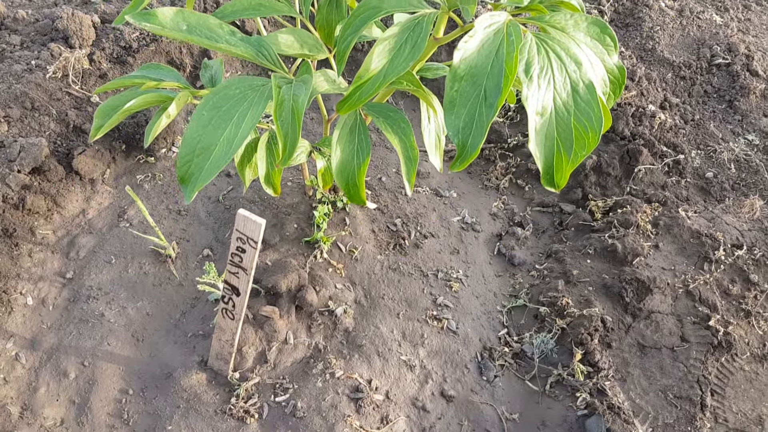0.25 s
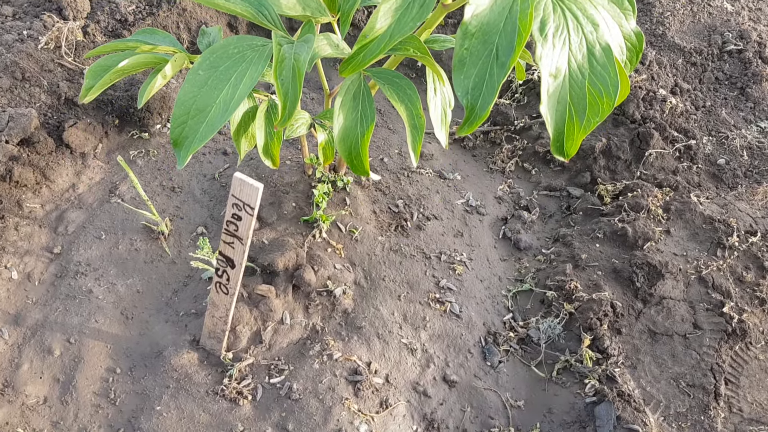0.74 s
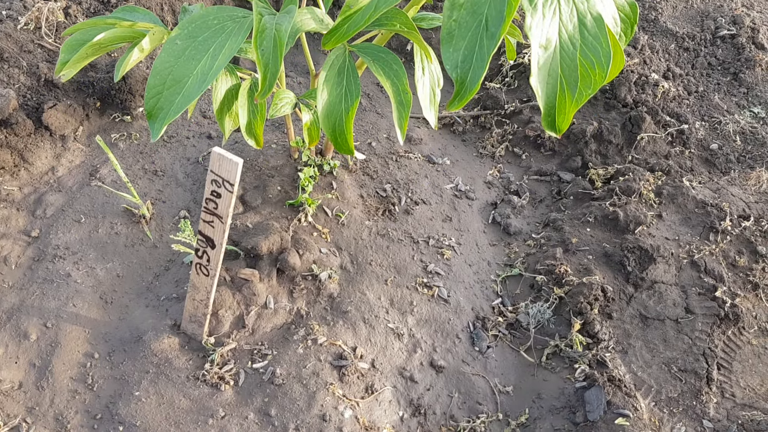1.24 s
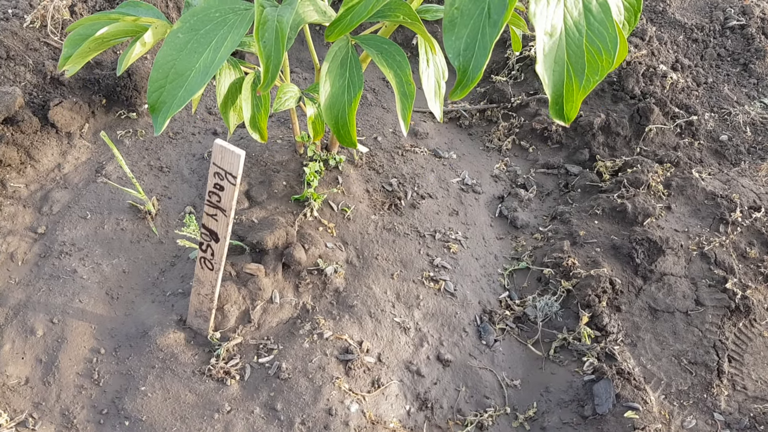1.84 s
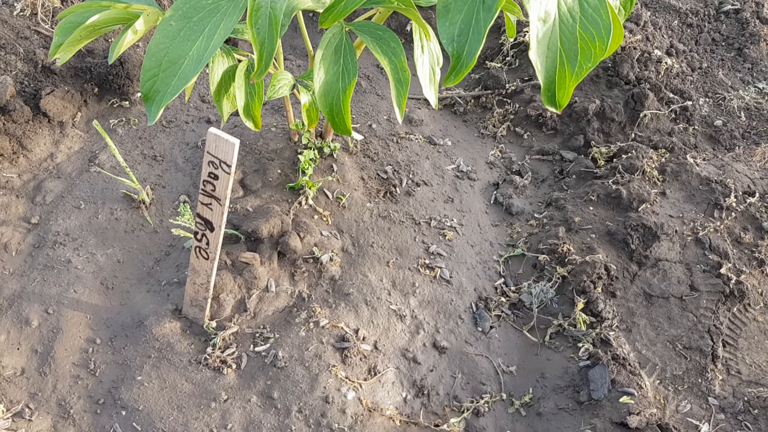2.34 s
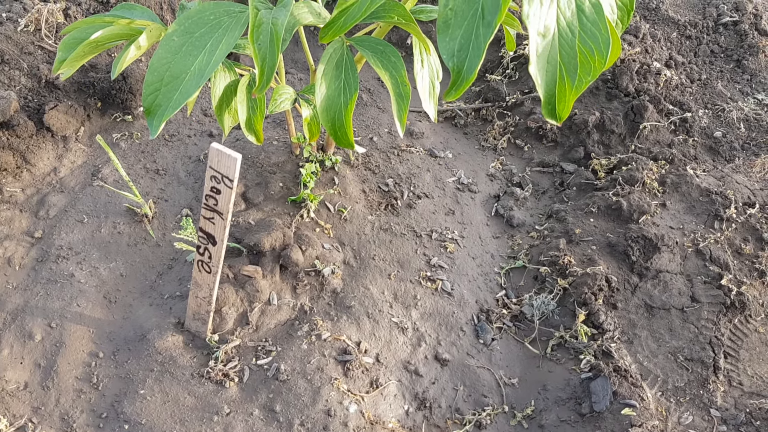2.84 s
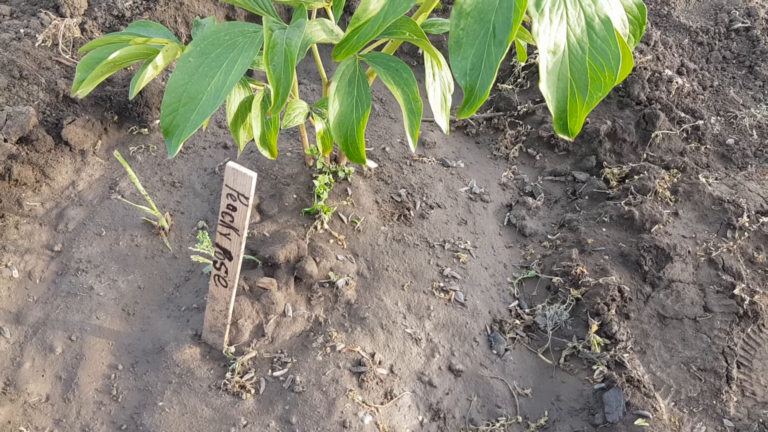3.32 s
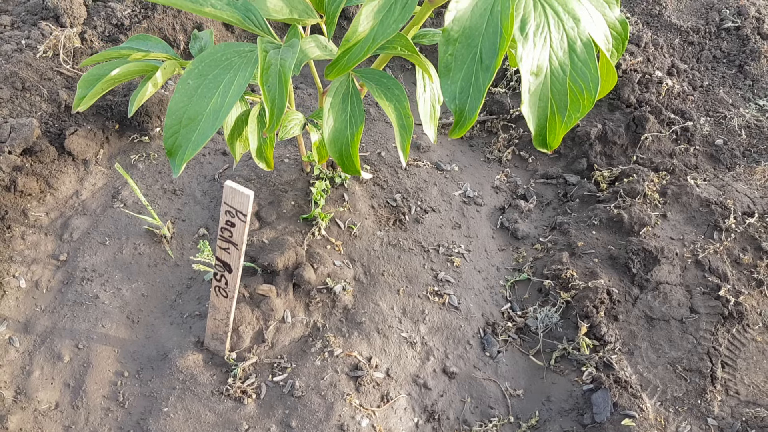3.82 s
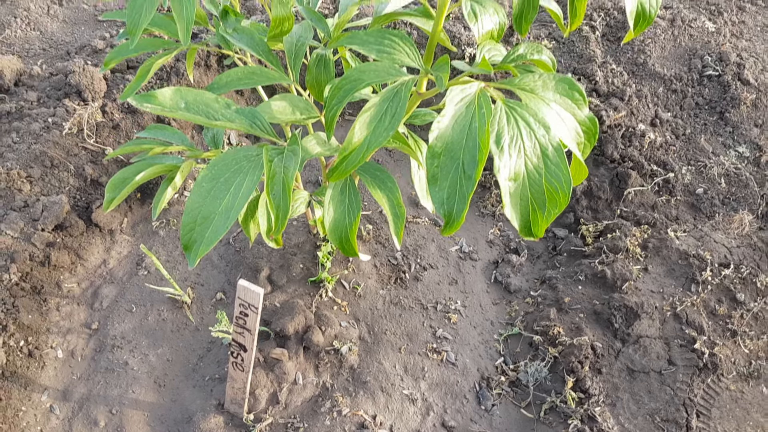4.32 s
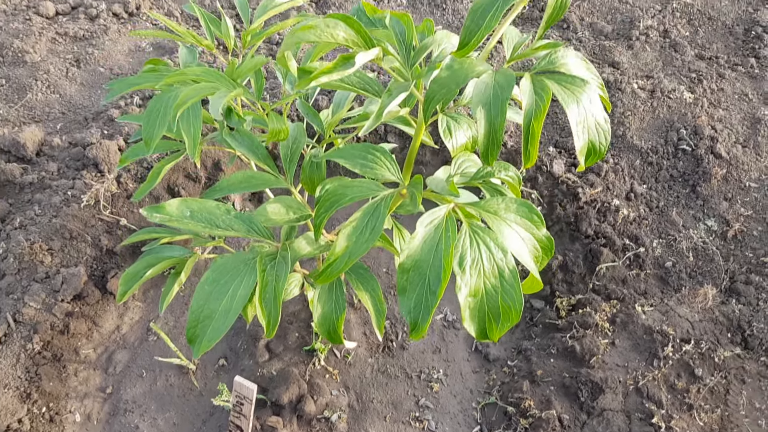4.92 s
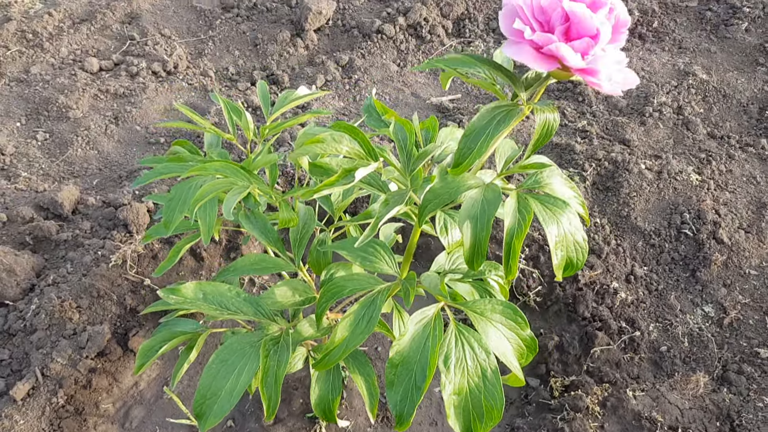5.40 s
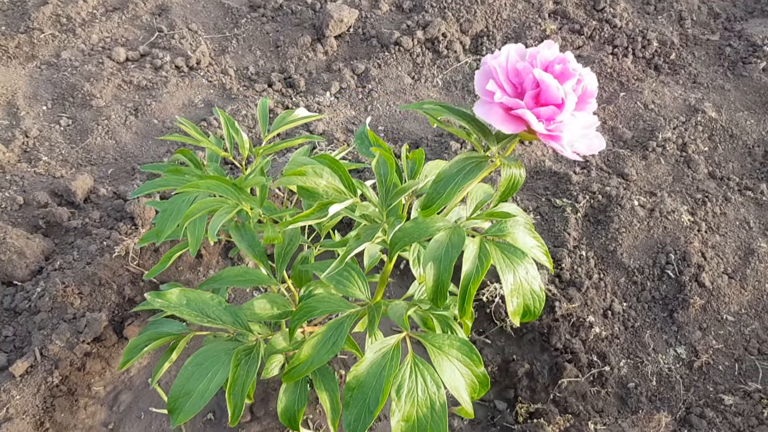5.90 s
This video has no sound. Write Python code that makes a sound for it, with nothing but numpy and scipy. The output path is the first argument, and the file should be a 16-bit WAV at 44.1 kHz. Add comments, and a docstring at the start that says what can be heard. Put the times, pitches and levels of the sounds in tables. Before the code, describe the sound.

Crickets chirp close by in a garden, in short, high pulses over a faint distant chorus. Low wind rumbles on the left side of a hand-held microphone, builds to hard buffets and cuts out just past halfway. The chirping goes on a little softer, and near the end come soft handling thuds and scuffs on dry soil. Birds and traffic are barely audible far off.

```python
"""Crickets chirp close by in a flower bed while wind rumbles on the left port of a hand-held microphone.
Each chirp is a short run of wing strokes, each falling in pitch; a far chorus trills behind them.
Past halfway the left rumble cuts out, and towards the end the holder shifts on dry soil.
Small birds, a dove, a rooster and hoarse calls carry faintly from far off, over hiss and traffic."""
import sys
import numpy as np
from scipy import signal
from scipy.fft import rfft, irfft
from scipy.io import wavfile
from scipy.ndimage import uniform_filter1d

SR = 44100
rng = np.random.default_rng(int(sys.argv[2]) if len(sys.argv) > 2 else 0)


def digitize_waveform(pressure):
    """Quantize a signal to 16-bit integers and store it at the path in sys.argv[1].

    Rows of a 2-D input are taken as channels; values are limited to [-1, 1].
    """
    field = np.atleast_2d(pressure).T
    bounded = np.clip(field, -1, 1)
    quanta = np.round(bounded * 32767).astype(np.int16)
    wavfile.write(sys.argv[1], SR, quanta)


N = 271308
T = np.arange(N) / SR
HZ = np.maximum(np.fft.rfftfreq(N, 1 / SR), 1)


def from_db(db):
    """Decibels to gain."""
    return 10 ** (np.asarray(db) / 20)


def rms_one(x):
    """Each channel scaled to rms 1."""
    return x / np.sqrt(np.mean(x ** 2, axis=-1, keepdims=True) + 1e-30)


def level_curve(rows):
    """Rows of (time [s], level [dB]) interpolated to every sample."""
    return np.interp(T, *np.transpose(rows))


def pan(left_db):
    """Channel gains for a left-minus-right level."""
    return from_db(left_db * np.array([[.5], [-.5]]))


def noise(spectrum, correlation=0):
    """Stereo noise of rms 1 with a given spectrum and left-right correlation."""
    hz, db = np.transpose(spectrum)
    gain = from_db(np.interp(np.log(HZ), np.log(hz), db))
    mid, side = irfft(rfft(rng.standard_normal((2, N))) * gain, N)
    return rms_one(np.sqrt(1 + correlation) * mid + np.sqrt(1 - correlation) * side * [[1], [-1]])


def drift(rate_hz):
    """A random wander of rms 1, mostly slower than rate_hz."""
    return rms_one(irfft(rfft(rng.standard_normal(N)) / (1 + (HZ / rate_hz) ** 2) ** 2, N))


def evened(x, span_s):
    """Noise with its slow swells taken out, so that a level curve alone sets them."""
    size = max(int(span_s * SR), 8)
    power = uniform_filter1d(uniform_filter1d(x ** 2, size), size)
    return rms_one(x / np.sqrt(np.abs(power) + 1e-6))


def swells(rows):
    """Envelope of bell-shaped bursts from rows of (time [s], half-width [s], level [dB])."""
    powers = (from_db(db) ** 2 * np.exp(-np.minimum(((T - s) / width) ** 2, 60)) for s, width, db in rows)
    return np.sqrt(sum(powers))


def scatter(x, t60_s, count=60):
    """Sparse echoes from soil, plants and fences, different at each port; unit power."""
    delay_s = rng.random((2, count)) * t60_s
    gains = rng.standard_normal((2, count)) * from_db(-60 * delay_s / t60_s)
    echoes = np.zeros((2, int(t60_s * SR) + 2))
    np.put_along_axis(echoes, (delay_s * SR).astype(int), gains, axis=1)
    echoes /= np.sqrt(np.sum(echoes ** 2, axis=1, keepdims=True))
    return signal.fftconvolve(np.atleast_2d(x), echoes, axes=1)[:, :N]


def add(out, s, sound):
    """Mix a short sound into a track from time s."""
    start = int(round(s * SR))
    lo, hi = max(start, 0), min(start + sound.shape[-1], N)
    if hi > lo:
        out[..., lo:hi] += sound[..., lo - start:hi - start]


# Hiss at the microphone: (frequency [Hz], relative level [dB])
HISS_SPECTRUM = [(30, 21), (100, -10.5), (250, 11), (450, 4.5), (1000, 1), (1500, 0), (2500, -2),
                 (3400, -3.5), (5200, -4.5), (6500, -15.5), (8200, -19.5), (10000, -7.5), (12000, 1),
                 (15500, 1)]
# Its rise and fall: (time [s], relative level [dB])
HISS_LEVEL = [(0.0, -75), (1.13, -77), (1.82, -74.5), (3.15, -74.5), (3.73, -78), (4.81, -76.5),
              (5.21, -77.5), (5.69, -77), (5.87, -73), (6.15, -75)]

def air_hiss(gain_db=7):
    """Still air and the microphone's own noise, independent on each side."""
    return from_db(level_curve(HISS_LEVEL) + gain_db) * noise(HISS_SPECTRUM)


# Traffic far off to the left: (frequency [Hz], relative level [dB])
TRAFFIC_SPECTRUM = [(200, -14.5), (450, -6.5), (700, 1), (1050, 5), (1350, -2), (1800, -9.5), (2800, -33)]
# Its swell and fade: (time [s], level [dB])
TRAFFIC_LEVEL = [(0, -80.5), (.8, -77), (1.2, -78.5), (1.7, -75), (2.1, -75.5), (2.5, -72.5), (2.9, -74),
                 (3.6, -81), (4.2, -82), (4.8, -87.5), (6.15, -88.5)]

def far_traffic(left_db=6.5):
    """Distant traffic merges into a slowly swelling wash that flutters slightly."""
    envelope = from_db(level_curve(TRAFFIC_LEVEL) + drift(8.9))
    return envelope * noise(TRAFFIC_SPECTRUM, correlation=0.23) * pan(left_db)


def note(length_s, start_hz, end_hz, waver):
    """Envelope and phase of a gliding note; waver is its rms flutter as a share of the pitch."""
    along = np.linspace(0, 1, int(length_s * SR))
    lowpass = signal.butter(2, 130, fs=SR, output="sos")
    flutter = rms_one(signal.sosfilt(lowpass, rng.standard_normal(len(along))))
    pitch_hz = (start_hz + (end_hz - start_hz) * along) * (1 + waver * flutter)
    return np.sqrt(np.sin(np.pi * along).clip(0)), 2 * np.pi * np.cumsum(pitch_hz) / SR


def far_notes(rows, waver, echo_t60_s):
    """Wavering sine notes that reach the microphone smeared by echoes."""
    direct = np.zeros(N)
    for s, length_s, start_hz, end_hz, db in rows:
        envelope, phase = note(length_s, start_hz, end_hz, waver)
        add(direct, s, from_db(db) * envelope * np.sin(phase))
    return 0.99 * direct + 1.1 * scatter(direct, echo_t60_s)


# Animals very far to the left: (time [s], length [s], start pitch [Hz], end pitch [Hz], level [dB])
ANIMAL_CALLS = [(.35, 0.15, 1000, 830, -74.5), (.80, 0.074, 843, 756.8, -78),
                (1.44, 0.057, 1058, 1064, -76), (2.34, 0.36, 949, 1086, -72.5),
                (3.39, 0.0947, 762, 862, -73), (3.67, 0.048, 1130, 1159, -76.5),
                (3.87, 0.044, 1150, 1104, -79), (5.21, 0.097, 833, 1028, -75.5)]

def far_animals():
    """Calls made hoarse by a strong flutter in pitch."""
    return far_notes(ANIMAL_CALLS, waver=0.0936, echo_t60_s=.4) * pan(left_db=12)


# A dove in the distance: (time [s], length [s], start pitch [Hz], end pitch [Hz], level [dB])
DOVE_COOS = [(.44, .11, 520, 520, -81), (1.13, .14, 505, 540, -80), (1.46, .32, 535, 510, -76),
             (3.04, .22, 530, 520, -76), (3.37, .28, 530, 510, -78)]

def dove():
    """Soft, low coos, nearly pure in tone."""
    return far_notes(DOVE_COOS, waver=0.028, echo_t60_s=0.35)


# A small bird, far off: (time [s], length [s], start pitch [Hz], end pitch [Hz], level [dB])
BIRD_CHIPS = [(.52, 0.0495, 3305, 2730, -79), (1.135, 0.034, 3850, 3060, -75),
              (1.16, 0.032, 3020, 2750, -69.5), (1.30, 0.046, 2760, 4060, -72),
              (1.39, 0.028, 4130, 3250, -72), (1.97, 0.016, 3930, 2995, -68),
              (1.985, 0.029, 2925, 2800, -68), (3.025, 0.021, 3730, 3270, -76),
              (3.045, 0.027, 2920, 2854, -68), (3.74, 0.043, 3200, 2880, -84),
              (3.92, 0.044, 3250, 2900, -82.5)]

def small_bird():
    """Brief, high whistles, most of them sliding down."""
    return far_notes(BIRD_CHIPS, waver=0.048, echo_t60_s=0.18)


# One distant crow: (time [s], length [s], start pitch [Hz], end pitch [Hz],
# third harmonic [relative dB], fourth harmonic [relative dB], hoarseness [share of pitch])
CROW_NOTES = [(5.362, 0.1, 551, 545, -85, -76, 0.024), (5.599, 0.13, 552, 534.5, -63.5, -80, 0.046),
              (5.822, 0.418, 559.5, 537, -66.5, -65.5, .065)]

def rooster(sixth_db=-16, echo_db=-3):
    """Only the harmonics near the throat resonance carry this far; the long last note is hoarse."""
    direct = np.zeros(N)
    for s, length_s, start_hz, end_hz, third_db, fourth_db, hoarseness in CROW_NOTES:
        envelope, phase = note(length_s, start_hz, end_hz, hoarseness)
        harmonics = ((3, third_db), (4, fourth_db), (6, third_db + sixth_db))
        add(direct, s, envelope * sum(from_db(db) * np.sin(k * phase) for k, db in harmonics))
    return 0.502 * direct + from_db(echo_db) * scatter(direct, t60_s=0.26)


# Ticks and scuffs from the holder: (time [s], half-width [s], thud [relative dB], grit [relative dB])
HOLDER_SHIFTS = [(0.158, 0.0027, -77, -71), (2.279, 0.025, -65.5, -70), (2.849, 0.00277, -72, -77),
                 (3.852, 0.019, -74, -76.5), (4.993, 0.00533, -59, -86), (5.061, 0.027, -63.5, -68),
                 (5.094, 0.0082, -48.5, -63), (5.131, 0.038, -66.5, -67), (5.147, 0.00065, -64, -57),
                 (5.214, 0.027, -59.5, -66), (5.303, 0.00096, -51, -59), (5.325, 0.0042, -50.5, -64),
                 (5.354, 0.029, -64, -74), (5.414, 0.006, -51.5, -73), (5.436, 0.01, -56.5, -71),
                 (5.597, 0.058, -63.5, -83), (5.602, 0.021, -50.5, -72), (5.708, 0.00205, -41, -57),
                 (5.726, 0.016, -44, -58.5), (5.779, 0.005, -57, -67.5), (5.805, 0.0078, -40.5, -60),
                 (5.843, 0.012, -51, -63.5), (5.884, 0.0078, -55.5, -80.5), (6.113, 0.0091, -54.5, -71),
                 (6.133, 0.0021, -44.5, -63)]
# Thud in the microphone housing: (frequency [Hz], relative level [dB])
THUD_SPECTRUM = [(60, -32), (150, 3.5), (300, 3.5), (450, -1), (700, -14), (1100, -37.5), (2500, -50)]
# Dry soil underfoot: (frequency [Hz], relative level [dB])
GRIT_SPECTRUM = [(800, 4), (2000, -3), (3200, -2.5), (5000, 4.5), (6500, -1.5), (8200, -16), (11500, -0.5),
                 (15500, -6.5)]

def holder_scuffs(thud_db=-0.5, grit_db=-6.5, crumble_db=4):
    """Each shift thuds through the housing and crunches a little dry soil, to the right."""
    shifts = np.array(HOLDER_SHIFTS)
    thud = swells(shifts[:, [0, 1, 2]]) * evened(noise(THUD_SPECTRUM), span_s=.01)
    grit = swells(shifts[:, [0, 1, 3]]) * noise(GRIT_SPECTRUM) * from_db(crumble_db * drift(430))
    return from_db(thud_db) * thud * pan(left_db=-4) + from_db(grit_db) * grit * pan(left_db=-11)


# Gusts on one microphone port: (time [s], port, half-width [s], level [dB])
PORT_GUSTS = [(.01, "left", 0.012, -36.5), (0.134, "left", 0.0071, -35), (0.202, "left", 0.025, -35),
              (0.375, "left", .028, -32), (0.587, "left", 0.023, -38.5), (0.854, "left", 0.018, -46.5),
              (1.303, "left", 0.027, -40.5), (1.64, "left", 0.024, -32), (1.772, "left", 0.0081, -33.5),
              (1.933, "left", 0.013, -42.5), (2.01, "left", 0.019, -40.5), (2.177, "left", 0.0266, -41),
              (2.356, "left", 0.031, -23.5), (2.499, "left", 0.012, -33), (2.626, "left", 0.019, -31.5),
              (2.809, "left", 0.037, -32), (2.94, "left", 0.049, -25), (3.208, "left", 0.017, -23.5),
              (3.311, "left", 0.03, -16.5), (3.494, "left", 0.02, -20.5), (3.59, "left", 0.014, -19.5),
              (3.662, "right", .025, -48), (3.847, "right", 0.021, -50), (4.038, "right", 0.017, -54),
              (4.213, "right", 0.012, -54), (4.462, "right", 0.023, -49), (4.834, "right", 0.0298, -54),
              (5.053, "right", 0.028, -43.5), (5.964, "right", 0.015, -44.5)]

def wind_pressure_db(port, breeze, flutter_db=1.5):
    """Wind pressure at one port: gusts swell and die on top of a fluttering breeze."""
    gusts = swells([(s, width, db) for s, side, width, db in PORT_GUSTS if side == port])
    between_gusts = from_db(level_curve(breeze) + flutter_db * drift(12))
    return 20 * np.log10(np.hypot(gusts, between_gusts))


# Wind rumble on the left port, which cuts out abruptly at about 3.6 s: (time [s], level [dB])
LEFT_BREEZE = [(0, -56.5), (.45, -45), (.72, -61), (.95, -50), (1.45, -54.5), (1.7, -40.5), (1.87, -50.5),
               (2.26, -54), (2.42, -36), (2.72, -49), (3.0, -30.5), (3.099, -35), (3.58, -26),
               (3.67, -90.5), (4.8, -97.5), (6.15, -83.5)]
# Wind rumble on the right port: (time [s], level [dB])
RIGHT_BREEZE = [(0, -62), (.4, -66), (1.4, -58), (2.501, -55.5), (3.149, -50), (3.38, -56), (3.529, -44),
                (3.78, -61), (4.15, -64.5), (4.72, -68), (5.15, -53.5), (5.28, -60.5), (5.6, -46),
                (6.15, -55)]
# Deep rumble at a port: (frequency [Hz], relative level [dB])
RUMBLE_SPECTRUM = [(15, -36), (30, -18), (45, -3.5), (60, 2), (85, -2), (120, -9.5), (170, -25),
                   (240, -33.5), (400, -47), (700, -79), (3000, -120)]
# Small eddies at a port: (frequency [Hz], relative level [dB])
EDDY_SPECTRUM = [(60, -6), (130, 4.5), (215, -3.5), (300, -15), (420, -29), (650, -40.5), (1000, -63),
                 (2500, -85), (8000, -115)]
# Hard buffets straight on the left port: (time [s], half-width [s], level [dB])
LEFT_BUFFETS = [(2.77, 0.0056, -37), (2.81, 0.0051, -37), (2.873, 0.0055, -13.5), (2.893, 0.019, -27.5),
                (2.99, 0.0063, -44), (3.224, 0.0041, -17), (3.278, 0.011, -27), (3.303, 0.023, -26),
                (3.332, 0.0074, -27.5), (3.497, 0.0086, -23.5), (3.565, 0.0076, -25), (3.59, 0.005, -16),
                (3.614, 0.0026, -28.5)]

def wind(eddy_db=-25, eddy_growth=1.28, strong_wind_db=-22, leak_db=-27):
    """Each port rumbles by itself; small eddies grow faster than the rumble, and buffets hit the left."""
    port_db = np.array([wind_pressure_db("left", LEFT_BREEZE), wind_pressure_db("right", RIGHT_BREEZE)])
    # the drifts make rumble and eddies lumpy by about 2 dB
    rumble = from_db(port_db + 2.02 * drift(9.8)) * evened(noise(RUMBLE_SPECTRUM), span_s=0.052)
    eddy_level_db = strong_wind_db + eddy_db + eddy_growth * (port_db - strong_wind_db)
    eddies = from_db(eddy_level_db + 2 * drift(12)) * noise(EDDY_SPECTRUM)
    buffets = swells(LEFT_BUFFETS) * evened(noise(EDDY_SPECTRUM), span_s=0.018)
    return rumble + eddies + buffets * from_db([[0], [leak_db]])


def wing_stroke(hz, port_phase=0, rise_s=.0125, decay_s=.013, fall_hz=150, late_fall_hz=135):
    """The scraper slows along the file, so the tone sags. Returns (start from the peak [s], tone)."""
    t = np.arange(-int(rise_s * SR), int(decay_s * SR)) / SR
    along = t / decay_s
    pitch_hz = hz - fall_hz * along - late_fall_hz * np.maximum(along, 0) ** 2
    envelope = np.cos(np.pi / 2 * np.where(t < 0, t / rise_s, along)).clip(0) ** 0.79
    phase = 2 * np.pi * (np.cumsum(pitch_hz) / SR + rng.random())
    return t[0], envelope * np.sin(phase + port_phase)


def far_strokes(centre_hz, spread_hz, count, spread_db=3.7):
    """Wing strokes at random times, pitches and sizes, smeared by distance; rms 1."""
    strokes = np.zeros((2, N))
    times_s = (np.arange(count) + 1.7 * rng.random(count)) / count * T[-1]
    for s, (detune, size, phase) in zip(times_s, rng.standard_normal((count, 3))):
        offset_s, tone = wing_stroke(centre_hz + spread_hz * detune, np.array([[0], [phase]]))
        add(strokes, s + offset_s, tone * from_db(spread_db * size))
    return rms_one(strokes + 2.2 * scatter(strokes, t60_s=.04))


# Cricket chorus, far behind the near singers: (time [s], relative level [dB])
CHORUS_LEVEL = [(0, -64), (1.0, -67.5), (1.38, -66.5), (1.62, -65.5), (2.4, -65), (3.0, -67.5), (3.2, -65),
                (3.45, -66), (3.75, -69.5), (4.6, -69.5), (5.2, -68), (5.4, -63), (5.55, -64), (5.9, -62.5),
                (6.15, -63.5)]
# Its farthest voices: (frequency [Hz], relative level [dB])
CHORUS_SPECTRUM = [(3500, -35.5), (3850, -11.5), (4150, -10.5), (4420, -1.5), (4700, -6), (5000, -14),
                   (5400, -25), (6200, -52.5)]
# A thinner, higher cricket that comes and goes out there: (time [s], half-width [s], level [dB])
THIN_TRILL = [(1.05, 0.091, -75), (1.37, .025, -66), (2.97, 0.055, -66.5), (4.87, 0.054, -67.5),
              (4.95, 0.015, -68), (5.12, 0.022, -63), (5.41, 0.051, -61.5), (5.76, 0.027, -63.5),
              (5.91, 0.017, -68), (6.14, 0.034, -76)]

def far_crickets(strokes_db=-4.8, blur_db=-4):
    """Many distant strokes at slightly different pitches; the farthest blur into a band of hiss."""
    strokes = from_db(strokes_db) * far_strokes(centre_hz=4440, spread_hz=120, count=380)
    blur = from_db(blur_db) * noise(CHORUS_SPECTRUM, correlation=0.18)
    chorus = (strokes + blur) * from_db(level_curve(CHORUS_LEVEL))
    trill = swells(THIN_TRILL) * far_strokes(centre_hz=4690, spread_hz=110, count=1100)
    # the chorus moves from the left to just right of centre
    left_db = np.interp(T, [3.4, 3.8, 5.4], [5, 0, -1.5])
    return (chorus + trill) * pan(left_db)


# One cricket, faint at the microphone: (time [s], strokes [count])
FAINT_CHIRPS = [(1.84, 2), (2.289, 3), (2.773, 3), (3.162, 3), (3.538, 2), (4.042, 1), (4.456, 3)]

def low_cricket(pitch_hz=3350, gain_db=-77.5, period_s=.042):
    """Lower-voiced wing strokes with a short scatter of echoes."""
    direct = np.zeros(N)
    for s, count in FAINT_CHIRPS:
        for k in range(count):
            offset_s, tone = wing_stroke(pitch_hz)
            add(direct, s + k * period_s + offset_s, tone)
    return from_db(gain_db) * (0.8 * direct + 0.39 * scatter(direct, t60_s=.06))


# Three crickets in the flower bed, close to the microphone, by name:
# (pitch [Hz], stroke period [s], swell per stroke [dB], pitch rise per stroke [Hz])
NEAR_SINGERS = {"steady": (4335, .0365, 1.3, 8.7), "eager": (4360, .039, 2.25, 22),
                "high": (4490, .040, 0.85, 13)}
# Their chirps: (time [s], singer, strokes [count], first stroke at the left port [relative dB],
# left minus right [dB])
NEAR_CHIRPS = [(0.175, "steady", 3, -54.5, 5), (0.222, "eager", 3, -54, 4.5),
               (0.465, "steady", 3, -52, 0.5), (0.582, "eager", 3, -52, 6.5),
               (0.801, "steady", 3, -52.5, 3), (0.844, "eager", 3, -50.5, 9), (1.099, "eager", 4, -56, 9),
               (1.149, "steady", 3, -50.5, 5.5), (1.348, "high", 2, -59, 15.5),
               (1.425, "steady", 3, -52, 5.5), (1.458, "eager", 3, -52, 15), (1.745, "steady", 3, -51, 3.5),
               (1.865, "eager", 3, -50, 10), (2.08, "steady", 3, -52, 2), (2.193, "eager", 3, -50, 14),
               (2.359, "steady", 3, -53.5, 1.5), (2.503, "eager", 3, -48, 14),
               (2.682, "steady", 3, -54.5, 1), (2.79, "eager", 3, -49, 11.5),
               (3.000, "steady", 3, -50.5, 4.5), (3.027, "eager", 3, -51, 8),
               (3.295, "eager", 3, -54.5, 11.5), (3.314, "steady", 3, -56.5, 1.5),
               (3.581, "eager", 2, -55, 6.5), (3.594, "steady", 3, -57, 1), (3.837, "eager", 2, -57, 5.5),
               (3.891, "steady", 3, -57, 0), (4.129, "eager", 2, -56, 9), (4.177, "steady", 3, -56.5, 2.5),
               (4.408, "eager", 2, -52.5, 5), (4.509, "steady", 3, -59.5, 3),
               (4.721, "steady", 3, -59.5, -1.5), (4.968, "steady", 3, -56.5, 1),
               (5.191, "high", 1, -58.5, 6), (5.294, "steady", 3, -60.5, -1.5),
               (5.561, "high", 1, -68, -7.5), (5.625, "steady", 3, -59, -5), (5.788, "high", 2, -59, 0),
               (5.85, "eager", 2, -57, 6), (5.902, "steady", 3, -57, 8), (5.908, "high", 3, -55, -6),
               (6.139, "high", 1, -56.5, 7)]

def near_crickets(direct_db=0.66, ground_db=-14, echo_db=-13, roughness=0.14, jitter_hz=14, jitter_db=.13):
    """Each chirp is a run of evenly spaced strokes that grow louder and higher; soil and leaves echo it."""
    direct = np.zeros((2, N))
    for s, singer, count, first_db, side_db in NEAR_CHIRPS:
        hz, period_s, swell_db, rise_hz = NEAR_SINGERS[singer]
        for k, (size, detune, path) in enumerate(rng.standard_normal((count, 3))):
            # a cricket off to one side reaches the two ports out of phase
            port_phase = np.array([[0], [0.2 * side_db + 0.75 * path]])
            offset_s, tone = wing_stroke(hz + k * rise_hz + jitter_hz * detune, port_phase)
            left_db = first_db + k * swell_db - jitter_db * size
            add(direct, s + k * period_s + offset_s, tone * from_db([[left_db], [left_db - side_db]]))
    direct *= 1 + roughness * drift(450)   # uneven file teeth
    ground = from_db(ground_db) * scatter(direct, t60_s=.02)
    echoes = from_db(echo_db) * scatter(direct, t60_s=.16)
    return from_db(direct_db) * direct + ground + echoes


def scene():
    """Crickets and far birds in the garden, with wind and handling at the microphone."""
    far_voices = small_bird() + dove() + rooster() + far_animals()
    crickets = near_crickets() + low_cricket() + far_crickets()
    at_microphone = wind() + holder_scuffs()
    return air_hiss() + far_traffic() + far_voices + at_microphone + crickets


def record(dry, cutoff_hz=15800):
    """The top of the band is cut steeply."""
    return signal.sosfilt(signal.ellip(12, .1, 80, cutoff_hz, fs=SR, output="sos"), dry)


dry = scene()
out = record(dry)
digitize_waveform(out)
```